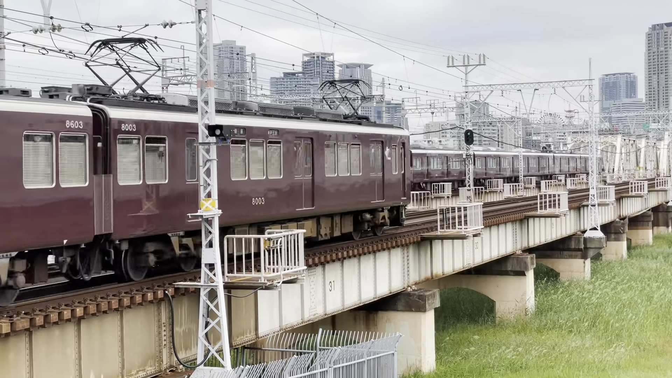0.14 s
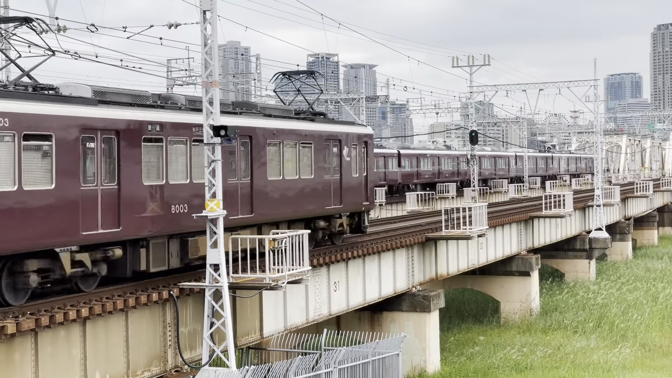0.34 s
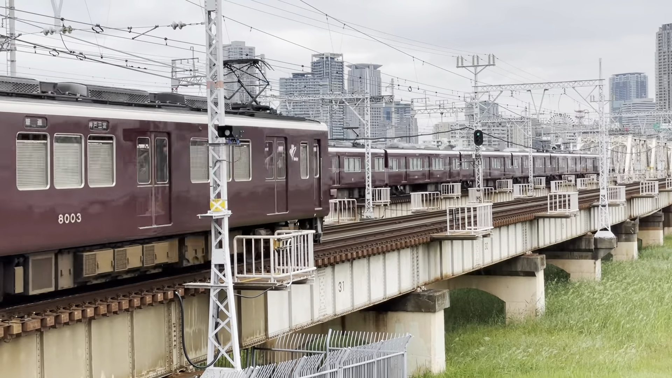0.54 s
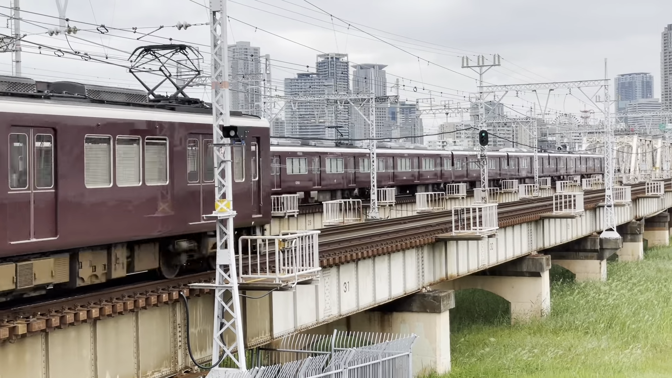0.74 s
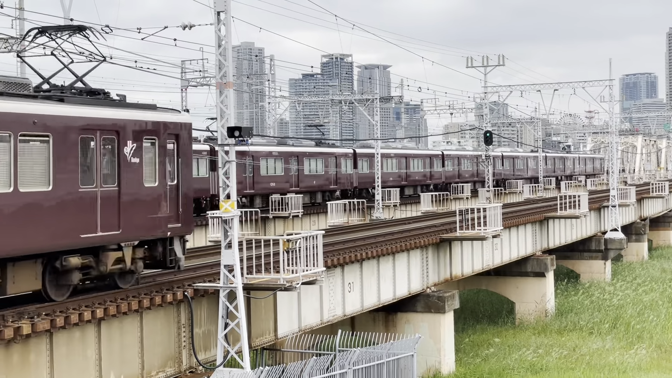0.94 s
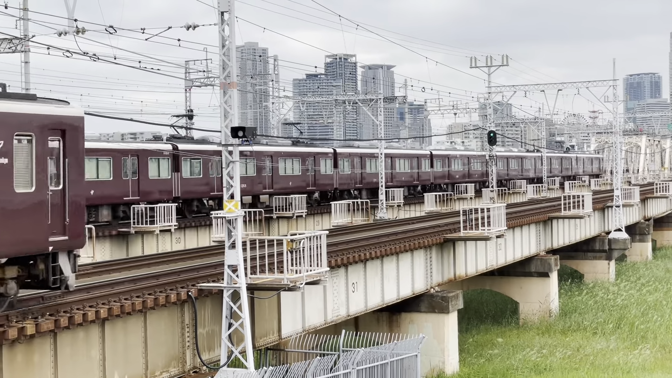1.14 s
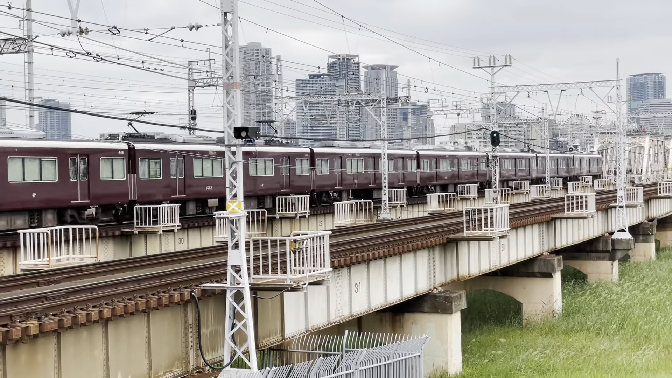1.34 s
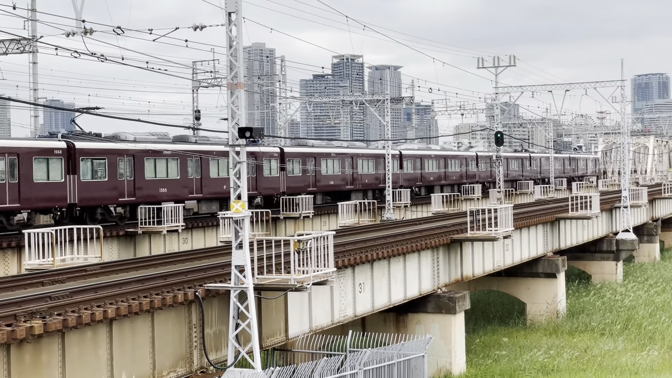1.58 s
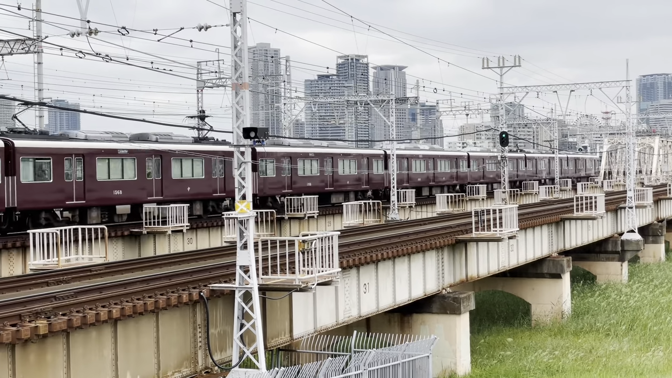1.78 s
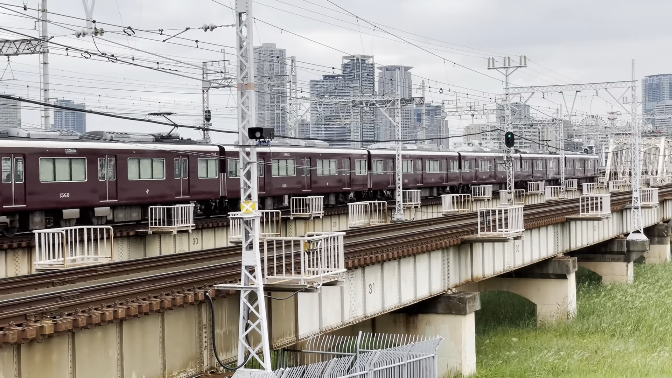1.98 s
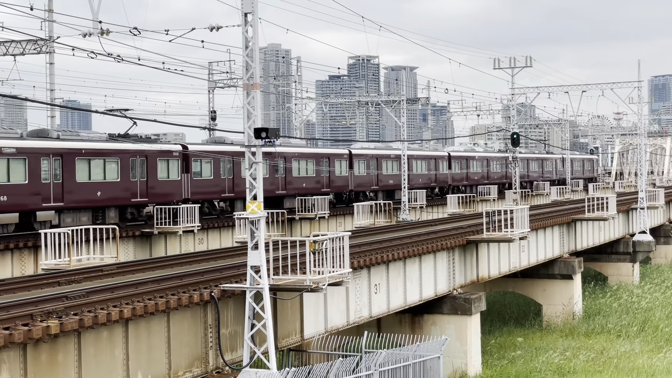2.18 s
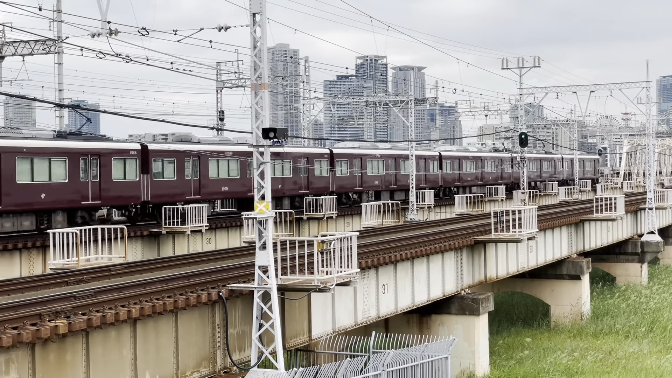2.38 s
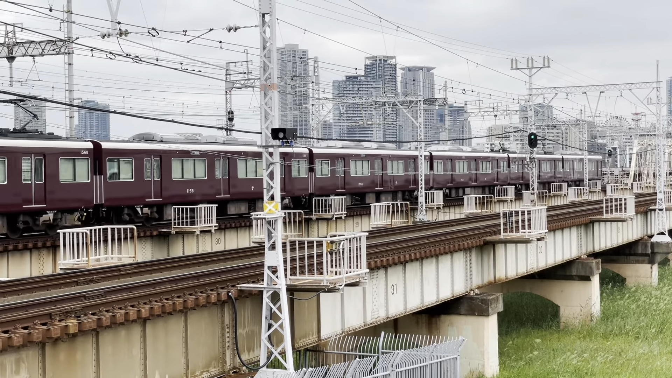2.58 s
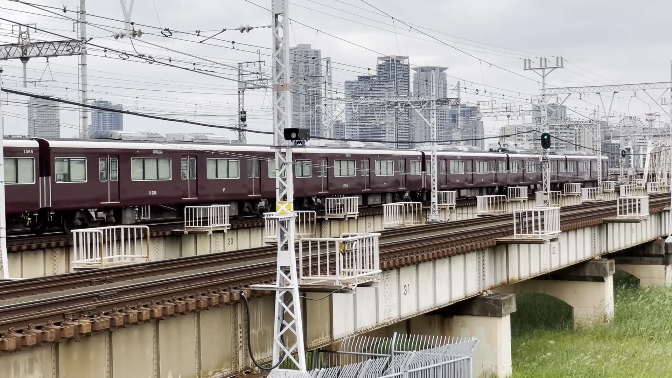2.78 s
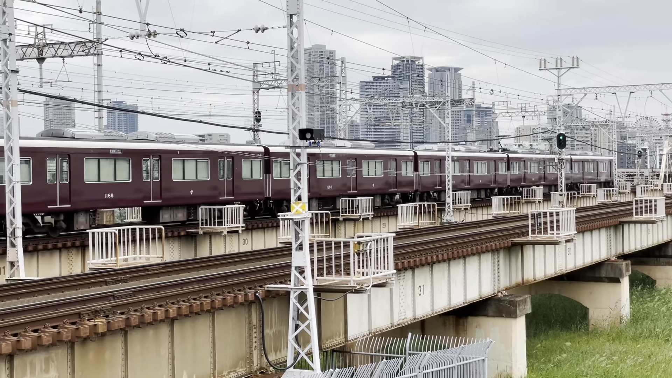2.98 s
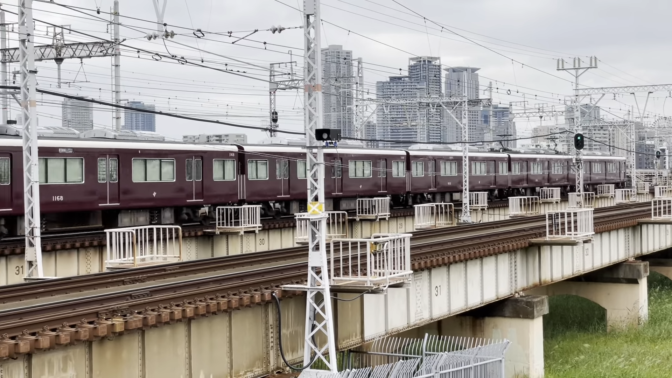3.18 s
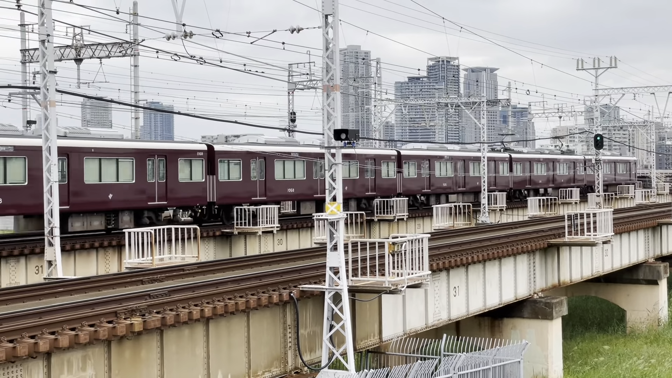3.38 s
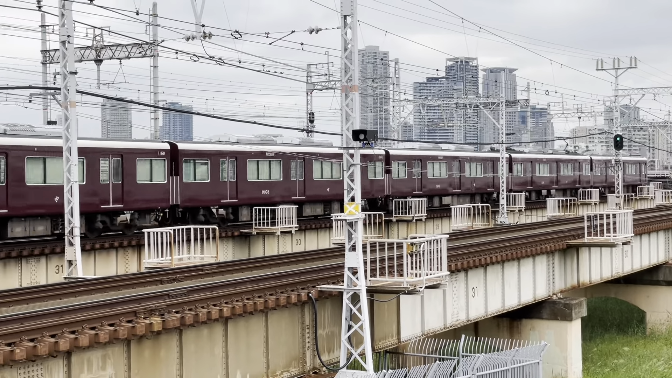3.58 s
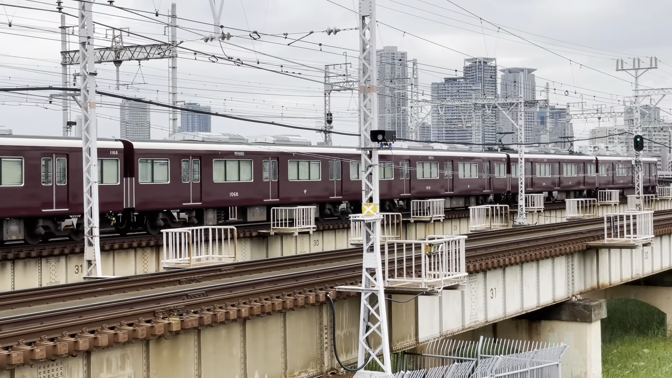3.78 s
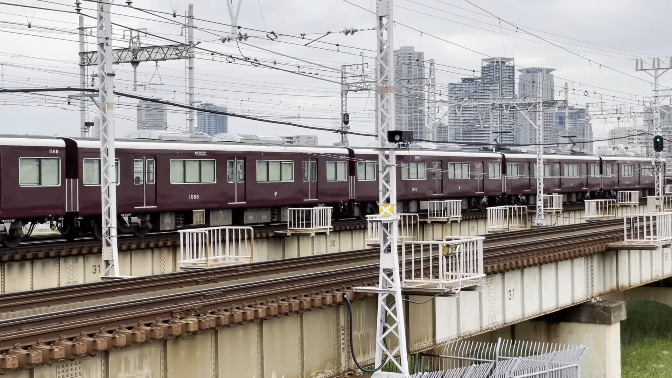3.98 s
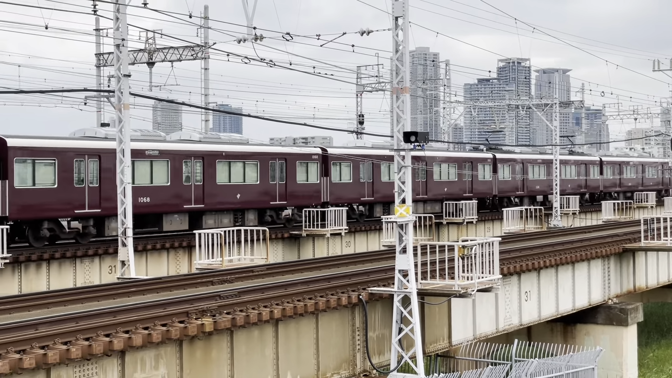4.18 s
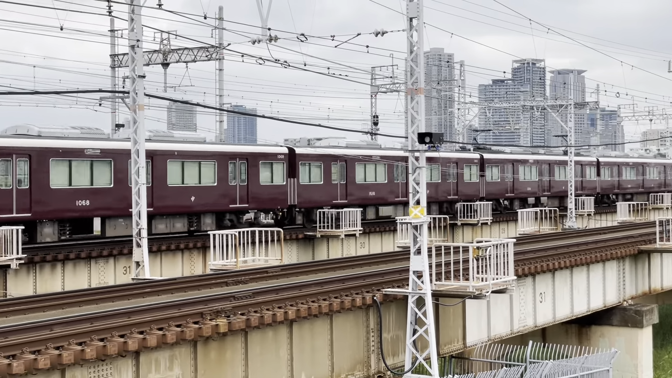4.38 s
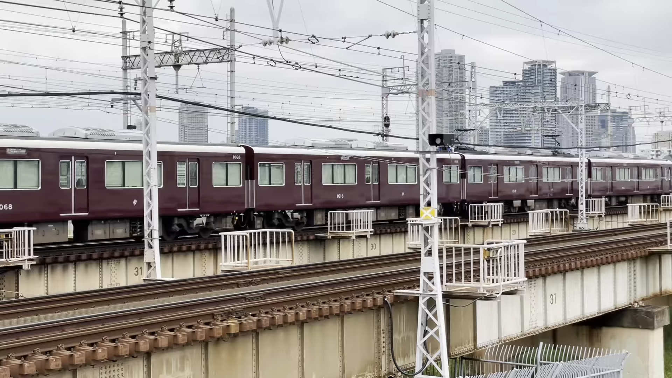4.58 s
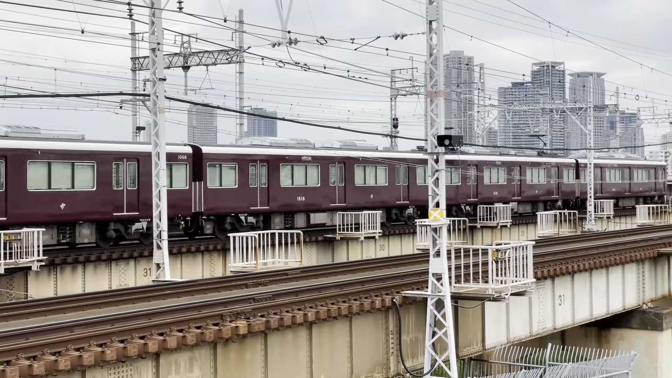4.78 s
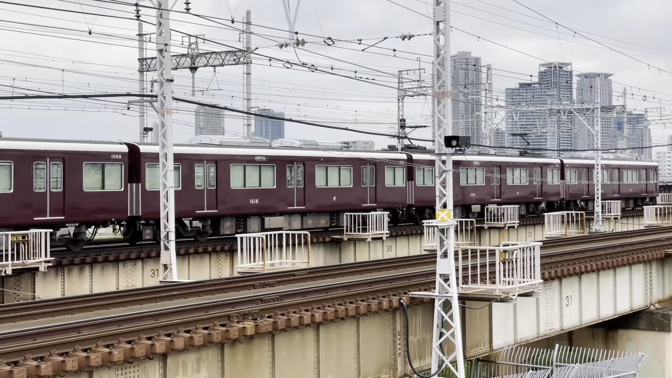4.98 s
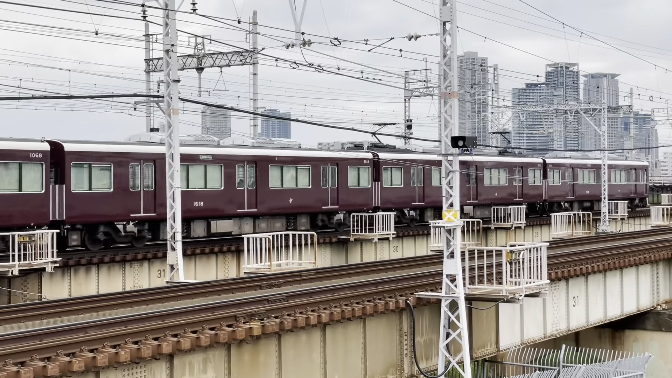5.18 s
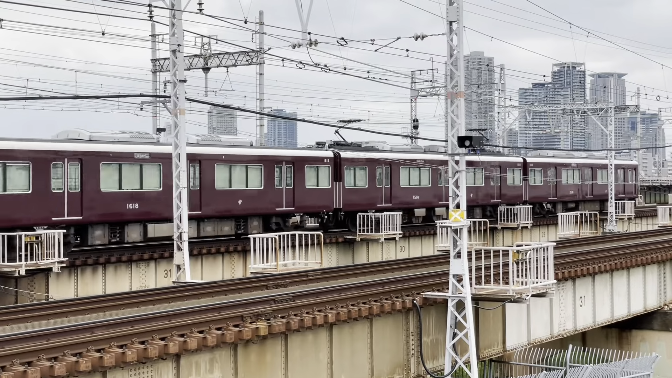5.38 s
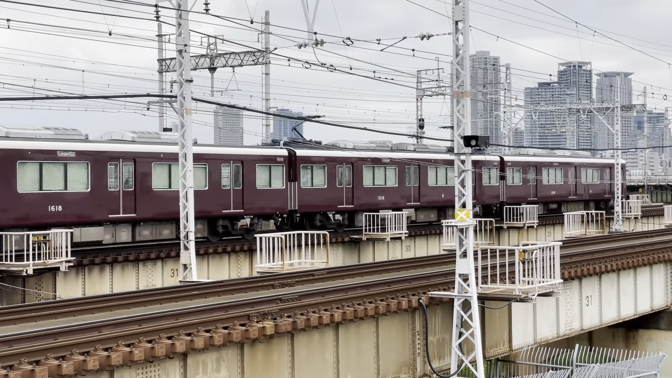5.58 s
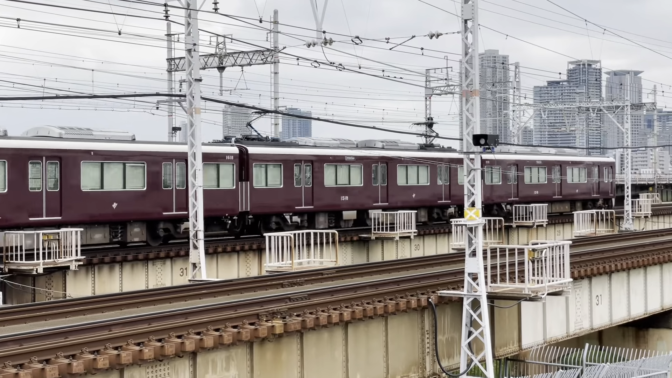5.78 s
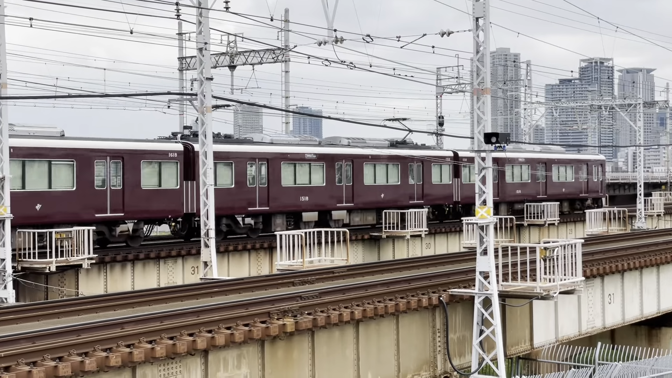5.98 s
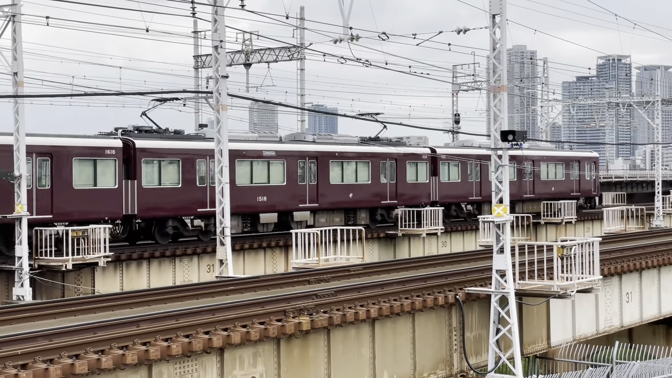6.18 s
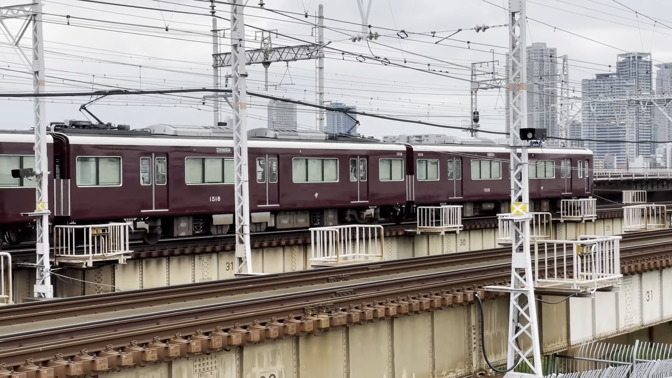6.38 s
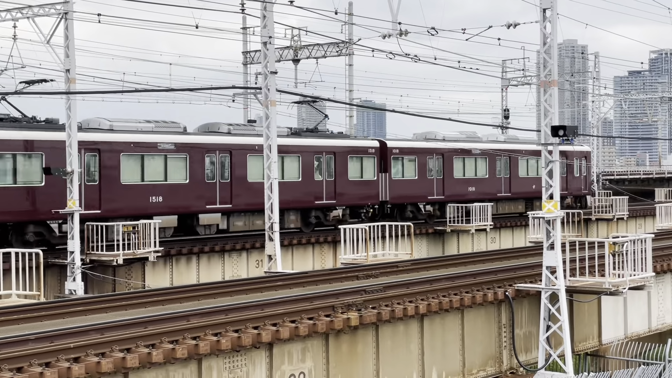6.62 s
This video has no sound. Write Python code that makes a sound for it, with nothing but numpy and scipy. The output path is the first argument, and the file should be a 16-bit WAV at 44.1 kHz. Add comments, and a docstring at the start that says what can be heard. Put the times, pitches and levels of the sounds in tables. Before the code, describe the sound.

A near train's last wheels thump and clang across a bridge joint, its whine sinking, then a farther train clatters on over booming girders.

```python
"""Rolling wheels of two electric trains on a steel girder bridge, heard from the riverbank.
Filtered noise makes deck roar and rail hiss; the near train's last axles pound a rail joint, its whine sinks.
Far axles clack over four joints, timed from speed and spacing: decaying noise bursts, with single clacks
of varied strength among them. Girders boom and web plates hum as resonant noise and decaying sines;
deck panels ring, loose steel rattles, ticks and clinks; a wheel flange squeaks."""
import sys
import numpy as np
from scipy import signal
from scipy.fft import rfft, irfft, next_fast_len
from scipy.io import wavfile
from scipy.ndimage import uniform_filter1d, map_coordinates

SR = 44100
rng = np.random.default_rng(int(sys.argv[2]) if len(sys.argv) > 2 else 0)


def materialize(psi):
    """Save the field psi as 16-bit PCM at rate SR to the path in sys.argv[1].

    A 1-D psi becomes a single channel; in a 2-D psi each row is a channel.
    """
    bounded = np.clip(np.atleast_2d(psi).T, -1, 1)
    quanta = np.round(bounded * 32767).astype(np.int16)
    wavfile.write(sys.argv[1], SR, quanta)


N = 293265

# "rel": relative level, before normalization, trims or sums
# rolling noise, swelling with each group of bogies: time_s, roar_rel_db, hiss_rel_db
ROLLING_LEVELS = [(0.0, -22, -32), (0.55, -23, -34.5), (0.85, -24.5, -35.5), (1.45, -24.5, -35.5),
                  (1.6, -24, -34.5), (1.7, -24, -32), (1.85, -23.5, -32), (2.03, -25.5, -34),
                  (2.15, -24.5, -35), (2.31, -26.5, -36), (2.46, -26, -34), (2.56, -26, -35.5),
                  (2.93, -25, -34.5), (3.1, -26, -34), (3.31, -26, -37), (3.42, -27, -37), (3.54, -27, -36),
                  (3.85, -24.5, -34), (4.1, -26, -33.5), (4.29, -26.5, -41), (4.41, -26, -37),
                  (4.85, -25, -33), (5.2, -26.5, -36), (5.3, -27, -37), (5.55, -26, -36.5),
                  (5.8, -25, -33.5), (6.15, -25.5, -36), (6.35, -27, -37.5), (6.5, -26, -37),
                  (6.65, -26, -38)]
# near train leaves: time_s, near_power_share (0-1)
NEAR_POWER_SHARE = [(0, 0.93), (1.25, 0.4), (1.7, 0.26), (2.6, 0.27)]
# far rail resonance, sinking as the far wheels draw near: time_s, pitch_hz
RAIL_SONG_PITCH = [(1.6, 2210), (2.2, 2160), (3.0, 2040), (6.65, 1957)]
# drive whine of the near train: time_s, pitch_hz, level_db
WHINE_TRACK = [(0, 5760, -59), (.33, 5760, -51), (.65, 5680, -49), (.87, 5600, -50), (1.2, 5470, -51),
               (1.6, 5450, -54.5), (2.0, 5410, -59), (2.7, 5380, -80)]
# far span under bogies and between them: time_s, boom_db, hum_db (before the track blend)
FAR_SPAN_LEVELS = [(1.58, -28.5, -45), (1.8, -30, -28), (2.17, -27, -28.5), (2.32, -26.5, -29.5),
                   (2.47, -30.5, -37), (2.68, -30, -28), (2.93, -26, -27), (3.1, -28, -26),
                   (3.28, -29, -31.5), (3.55, -31, -29.5), (3.76, -26, -26.5), (4.1, -26.5, -26),
                   (4.43, -33, -34.5), (4.62, -29, -27.5), (4.9, -29, -31), (5.1, -23, -28),
                   (5.35, -26, -29.5), (5.52, -29, -36), (5.72, -26, -26.5), (6.16, -25.5, -23.5),
                   (6.38, -33, -27.5), (6.65, -26, -32.5)]
NEAR_BOOM_DB = -24.5  # near girders under plain rolling, before the track blend

# girder modes: centre_hz, nominal_width_hz (girder_noise widens it), level_rel_db
NEAR_GIRDER_MODES = [(61, 23, -5), (87, 13, -12), (107, 12, -13.5)]
FAR_GIRDER_MODES = [(52.5, 9.2, 3.5), (64.4, 10, -3.5), (78, 18, -4.5), (99, 42, -2)]
# web plate modes: centre_hz, nominal_width_hz (girder_noise widens it), level_rel_db
NEAR_WEB_MODES = [(138.7, 15, 1.5), (164, 24, -1.5), (197, 13, -0.5), (236.4, 27, 8)]
FAR_WEB_MODES = [(147.7, 11.6, 4), (176.4, 9.5, -2), (196, 20, -3.5), (216, 23, -3)]
# deck plate humps on the broad spectrum: centre_hz, width_hz, hump_db
NEAR_PLATE_HUMPS = [(316, 46, 1.5), (372, 31, -2), (655, 65, 0.5), (1630, 160, 3)]
FAR_PLATE_HUMPS = [(259, 74, 1.26), (332, 50, 2), (690, 110, 0.8)]
# rail and wheel humps on the broad spectrum: centre_hz, width_hz, hump_db
NEAR_RAIL_HUMPS = [(1130, 200, 2), (1630, 190, 4.2), (2120, 360, 2)]
RAIL_HUMPS = [(2780, 410, 3), (3570, 200, 2.3), (4050, 350, 3.5)]
WHEEL_HUMPS = [(1690, 90, 2), (2570, 92, 1.5), (7000, 400, 7.3), (7600, 230, 11)]

# broad spectra of deck, rail, wheel and loose fastenings: frequency_hz, density_rel_db_per_hz
NEAR_DECK_SPECTRUM = [(50, -32), (110, -3.5), (200, -3.5), (290, -1), (390, -5), (800, -8.5), (1200, -15.5),
                      (1800, -23), (3000, -52), (6000, -74)]
FAR_DECK_SPECTRUM = [(60, -48), (115, -16.5), (160, -1.5), (300, -2.5), (460, -6), (580, -7.5), (800, -7.5),
                     (1200, -16), (1700, -29), (3000, -44), (6000, -62)]
RAIL_SPECTRUM = [(600, -49), (1300, -3.5), (2100, -0.5), (2450, -2), (2850, -2), (4000, -8), (5300, -10),
                 (6000, -15), (7200, -13.5), (9500, -21), (13500, -24.5), (15000, -40)]
WHEEL_SPECTRUM = [(500, -25), (1100, 4), (2100, 0.5), (2500, -2.5), (3800, -6.5), (5300, -13), (7200, -19),
                  (10000, -41), (15000, -53)]
NEAR_WHEEL_SPECTRUM = [(500, -16), (1100, 0.5), (1900, 3.5), (2500, -2.5), (3800, -5.5), (5300, -8.5),
                       (7200, -17.5), (10000, -33), (15000, -55)]
RATTLE_SPECTRUM = [(3000, -27), (6500, 7.5), (8000, 13.5), (10000, 8.5), (12000, 5), (13700, 4),
                   (15000, -11)]
# near blow in the deck, near blow in the rail, rim on rail end: frequency_hz, density_rel_db_per_hz
THUD_SPECTRUM = [(50, -38), (110, -14), (170, -4.5), (290, -0.5), (400, -2), (520, -5), (750, -31),
                 (1500, -52)]
SLAM_SPECTRUM = [(250, -35), (480, -4), (750, 1), (1200, -8), (1800, -15), (3000, -52), (6000, -70)]
CLINK_SPECTRUM = [(1200, -18), (2000, -1), (3000, 1), (4300, -9), (5500, -8), (8000, -26), (15000, -50)]

# girder heaving under a passing axle: start_s, pitch_hz, level_db
GIRDER_HEAVES = [(.06, 69, -26), (.13, 74, -28), (.22, 94, -21), (.285, 85, -22.5), (.41, 80, -22),
                 (.53, 92, -21), (.62, 83.5, -19.5), (.78, 83, -24), (.87, 84, -29), (.925, 81, -26),
                 (1.085, 88.4, -21.5), (1.17, 90, -21.5), (1.23, 88.5, -14.5), (1.35, 92, -24.5),
                 (1.75, 79.6, -23), (1.83, 77.6, -23.5), (1.92, 73.3, -25), (2.09, 76.6, -23.5),
                 (2.2, 76, -23), (2.74, 72.6, -24), (2.9, 59, -21), (2.98, 69.4, -27), (3.31, 66, -27),
                 (3.46, 75.4, -25.5), (3.71, 75, -23), (3.795, 60, -22), (3.91, 56.6, -24.5),
                 (4.05, 65.5, -21.5), (4.28, 65, -27), (4.47, 70, -24), (4.715, 66, -23), (4.81, 71, -25),
                 (5.04, 55.6, -25), (5.145, 59, -24), (5.495, 71, -22), (5.94, 66.2, -28),
                 (6.065, 82, -22.5), (6.225, 64, -21), (6.305, 71.5, -23), (6.39, 68, -27),
                 (6.45, 71.6, -24.5), (6.57, 71, -26)]
# web plate humming under a passing bogie: start_s, pitch_hz, level_db
WEB_HUMS = [(.265, 204, -27), (.645, 222.3, -21), (1.74, 168, -26), (1.81, 157, -27), (2.07, 150.5, -24),
            (2.565, 193.7, -25), (2.705, 178, -24.5), (2.88, 263.6, -24.5), (2.93, 160, -26),
            (3.06, 151.6, -22), (3.145, 200, -26.5), (3.555, 205, -23.5), (3.685, 177.5, -24),
            (3.925, 190, -25), (4.545, 211.5, -21), (4.665, 175, -25), (4.78, 289, -27.5),
            (4.885, 207.5, -27), (5.04, 285, -28.5), (4.975, 162, -24.5), (5.06, 198.5, -24),
            (5.71, 151.2, -22.5), (5.98, 147, -27), (6.085, 189.5, -22.5), (6.17, 215, -25.5)]
# steel on steel: start_s, centre_hz, level_db
STEEL_TICKS = [(.116, 12500, -51), (.252, 13000, -41), (.428, 12000, -48), (1.203, 13100, -39),
               (3.237, 12000, -47), (4.334, 8550, -41), (4.834, 13330, -42), (6.046, 8850, -44),
               (6.284, 8950, -36.5)]
# last near axles at the joint, two to a bogie:
# start_s, thud_db, slam_rel_db, clang_db, rattle_db, web_ring_db, boom_db (last two before the track blend)
NEAR_AXLE_BLOWS = [(0.122, -20, -23, -31.5, -48, -38, -31), (0.224, -20.5, -19, -28, -44, -26, -27),
                   (0.43, -17.5, -21, -29, -44, -23, -31), (0.536, -17.5, -21, -29, -44, -17.5, -24),
                   (1.076, -17.5, -21, -30, -46, -18, -24), (1.182, -18, -19, -29.5, -46, -19.5, -23)]
THUD_DELAY_S = 0.0057  # deck answers after the rail
PLATE_HZ, PLATE_DB = 326.3, -5  # plate under the near joint; level relative to thud
# cross beam punch; level relative to thud
PUNCH_HZ, PUNCH_DB, PUNCH_DELAY_S = 191.5, -0.5, 0.02113
# flange squeaks: peak_s, length_s, level_db
FLANGE_SQUEAKS = [(0.267, 0.045, -42), (0.552, .1, -49)]
SQUEAK_HZ = 13650
# deck panels under the wheels: start_s, centre_hz, level_db
PANEL_RING_EVENTS = [(1.22, 530, -25), (1.79, 720, -32), (2.07, 440, -28), (2.185, 427, -23),
                     (2.739, 498, -36), (2.87, 390, -27), (3.70, 750, -32), (3.72, 380, -32),
                     (4.02, 800, -35), (4.70, 770, -29), (4.77, 390, -29.5), (5.01, 736, -31),
                     (5.735, 740, -26.5), (5.92, 600, -39), (6.09, 830, -32)]
PANEL_WIDTH_HZ = 170
# far coupling, a bogie on either side, at the first joint:
# start_s, knock_rel_db, clang_rel_db, rattle_rel_db
COUPLING_BLOWS = [(1.616, -6, -7.5, -18), (2.593, -3, -2.5, -13), (3.567, -2, -1.5, -7), (4.567, -2, 0, -5),
                  (5.59, -4, 0.5, -3)]
# each far joint: knock_rel_db, clang_rel_db, rattle_rel_db
JOINT_LEVELS = [(-24, -31, -48), (-24.5, -35, -44), (-29, -33.5, -45), (-29.5, -43, -53)]
# far train slowing a little: time_s, speed_m_per_s
FAR_TRAIN_SPEED = [(1.6, 19.5), (3.6, 19.1), (4.6, 18.75), (5.6, 18.15)]
# four axles around a coupling: distance_behind_first_m
AXLE_OFFSETS_M = [0, 2.15, 6.1, 8.25]
# the same axles: strength_rel_db
AXLE_STRENGTHS_DB = [1.5, -0.54, -0.79, 1.5]
# four far joints: distance_past_first_m
JOINT_OFFSETS_M = [0, 2.8, 6.25, 8.35]
# single far wheel clacks, strong and faint: start_s, knock_db, clang_db, rattle_db
FAR_CLACKS = [(1.618, -36, -31, -56), (1.725, -42, -34, -57), (1.945, -22, -33, -49),
              (2.075, -24.5, -29.5, -42), (2.188, -22, -32.5, -45), (2.350, -25, -35.5, -49),
              (2.598, -31, -34, -59), (2.728, -20, -28.5, -42.5), (2.838, -23, -42, -44),
              (3.050, -24, -31, -42), (3.164, -40, -40, -43), (3.340, -37, -48, -47),
              (3.688, -35, -29, -43), (3.795, -28, -35, -47), (3.895, -34.5, -37, -54),
              (4.000, -38, -38, -46), (4.035, -37, -33, -50), (4.214, -33, -36.5, -47),
              (4.328, -25, -39, -46), (4.465, -29, -46, -48), (4.705, -24, -33, -44),
              (4.895, -43, -41, -49), (5.045, -35, -31.5, -48), (5.240, -27, -46, -51),
              (5.338, -40, -43, -52), (5.715, -30, -34, -50), (5.750, -36, -31.5, -55),
              (5.932, -24, -37, -46), (6.085, -30, -30, -42), (6.399, -34, -49, -52)]
# wheel rim on a rail end: start_s, level_db
RIM_CLINKS = [(1.955, -41), (2.368, -34), (2.845, -44), (3.045, -40), (3.165, -37), (3.338, -43),
              (3.69, -45), (4.22, -40), (4.335, -40), (4.895, -39), (5.05, -39), (5.342, -37), (6.08, -37),
              (6.205, -41), (6.4, -37)]

# microphone ports: frequency_hz, likeness (0-1)
PORT_LIKENESS = [(60, .997), (200, .96), (350, .88), (450, .68), (900, .73), (1120, .63), (1450, .92),
                 (2000, .99), (5000, .92), (7000, .86), (8900, .97), (12000, .76), (13200, .98)]
# microphone ports: frequency_hz, left_lead_rad
PORT_LEAD = [(60, .05), (350, .48), (450, .95), (1050, 1.1), (1350, .3), (2000, 0), (3000, .6), (5300, .6),
             (5700, -1.6), (6700, -.8), (7600, -2.3), (8900, -3.14), (13000, -6.28)]
# microphone ports: frequency_hz, left_minus_right_db
PORT_LEVEL_DIFFERENCE = [(60, .2), (220, .6), (420, 1.5), (650, 1.4), (950, 4), (1400, 1.3), (1700, 1.2),
                         (2100, 0)]
TOP_HZ = 15000


def amp(db):
    """Decibels to gain."""
    return 10 ** (np.asarray(db) / 20)


def unit(x):
    """Scale to rms 1."""
    return x / np.sqrt(np.mean(x ** 2) + 1e-20)


def along(points, hz):
    """Values at hz, interpolated on a log frequency axis."""
    point_hz, values = np.transpose(points)
    return np.interp(np.log(hz + 1), np.log(point_hz + 1), values)


def curves(rows):
    """One value per sample for each column after the time."""
    time_s, *columns = np.transpose(rows)
    return [np.interp(np.arange(N) / SR, time_s, column) for column in columns]


def wobble(knots_per_s):
    """Smooth random curve through Gaussian knots."""
    knots = rng.standard_normal(int(N * knots_per_s / SR) + 4)
    return map_coordinates(knots, [np.arange(N) * knots_per_s / SR])


def filtered(x, response):
    """Apply a complex frequency response by FFT, padded by at least half a second."""
    size = next_fast_len(N + SR // 2)
    hz = np.fft.rfftfreq(size, 1 / SR)
    return irfft(rfft(x, size) * response(hz), size)[..., :N]


def noise(response):
    """Two independent noises (direct and scattered sound) of one colour, joint rms 1."""
    return unit(filtered(rng.standard_normal((2, N)), response))


def resonance(hz, centre_hz, width_hz):
    """Gain of one steep-sided resonance; width is at half gain."""
    detuning = (hz * hz - centre_hz ** 2) / (hz * width_hz + 1)
    return 1 / (1 + detuning ** 2)


def steel(spectrum, humps=(), grain_db=0, grain_rate=200):
    """Noise of a steel part: broad spectrum plus resonant humps, broken up by chattering contact."""
    def response(hz):
        hump_db = sum(db / (1 + (2 * (hz - centre) / width) ** 2) for centre, width, db in humps)
        return amp(along(spectrum, hz) + hump_db)

    chatter = rng.standard_normal((2, N)) * amp(grain_db * wobble(grain_rate))
    return unit(filtered(chatter, response))


def evened(x, steadiness, size):
    """Even out vibration strength over size samples; steadiness 1 is fullest."""
    power = np.abs(uniform_filter1d(x ** 2, size=size, axis=1))
    strength = np.sqrt(power + 1e-6)
    return unit(x / strength ** np.clip(steadiness, 0, 1))


def patches(x, depth_db):
    """Neighbouring steel modes swell and fade by turns: smooth random gains over time and frequency."""
    z = signal.stft(x, nperseg=2048)[2]
    field = rng.standard_normal(z.shape[1:])
    field = uniform_filter1d(field, size=3, axis=0)  # frequency
    field = uniform_filter1d(field, size=5, axis=1)  # time
    gain = amp(abs(depth_db) * unit(field))
    return unit(signal.istft(z * gain, nperseg=2048)[1][:, :N])


def gliding(hz, half_width_hz, steadiness):
    """Fuzzy line of rms 1 on a pitch curve: low-pass complex noise shifted up."""
    line = lambda f: 1 / (1 + (f / half_width_hz) ** 2)
    fuzz = noise(line) + 1j * noise(line)
    carrier = np.exp(2j * np.pi * np.cumsum(hz) / SR)
    return evened(np.real(fuzz * carrier), steadiness, size=200)


def strike(t, rise_s, t60_s):
    """A blow spreads through the steel, then decays exponentially; peak 1."""
    shape = (1 - np.exp(-(t / rise_s) ** 2)) * amp(-60 * t / t60_s)
    return shape / shape.max()


def blows(times_s, levels_db, rise_s, t60_s):
    """Envelope of a row of blows; their powers add."""
    power = np.zeros(N + SR)
    shape = strike(np.arange(SR) / SR, rise_s, t60_s)
    for start_s, db in zip(times_s, levels_db):
        first = max(round(start_s * SR), 0)
        power[first:][:SR] += (amp(db) * shape) ** 2
    return np.sqrt(power[:N])


def rings(rows, width_hz, rise_s, t60_s, size):
    """One resonant noise burst, at most 0.5 s, per row, evened over size samples."""
    out = np.zeros((2, N + SR))
    t = np.arange(SR // 2) / SR
    hz = np.fft.rfftfreq(len(t), 1 / SR)
    shape = strike(t, rise_s, t60_s)
    for start_s, centre_hz, db in rows:
        spectrum = rfft(rng.standard_normal((2, len(t))))
        ring = irfft(spectrum * resonance(hz, centre_hz, width_hz), len(t))
        steady = evened(ring, steadiness=0.52, size=size)
        out[:, round(start_s * SR):][:, :len(t)] += amp(db) * shape * steady
    return out[:, :N]


def swings(rows, rise_s, t60_s):
    """One bending mode per row swings up and dies: a sine with random phases."""
    out = np.zeros((2, N + SR))
    t = np.arange(SR) / SR
    shape = np.sqrt(2) * strike(t, rise_s, t60_s)
    phases = rng.random((len(rows), 2, 1))  # cycles
    for (start_s, hz, db), phase in zip(rows, phases):
        first = max(round(start_s * SR), 0)
        out[:, first:][:, :SR] += amp(db) * shape * np.sin(2 * np.pi * (hz * t + phase))
    return out[:, :N]


def both_tracks(near, far):
    """Power blend of the two tracks as the near train leaves."""
    share = np.clip(curves(NEAR_POWER_SHARE)[0], 0, 1)
    return np.sqrt(share) * near + np.sqrt(1 - share) * far


def girder_noise(modes, steadiness):
    """Low bending modes kept ringing by the wheels at a fairly even strength."""
    def response(hz):
        power = sum((amp(db) * resonance(hz, centre, 1.53 * width)) ** 2 / width
                    for centre, width, db in modes)
        return np.sqrt(power)

    return evened(noise(response), steadiness, size=2200)


def rolling():
    """Rough wheels shake deck and rails without pause: deck roar, rail hiss and a sinking rail resonance."""
    roar_db, hiss_db = curves(ROLLING_LEVELS)
    near_deck = amp(3.0) * steel(NEAR_DECK_SPECTRUM, NEAR_PLATE_HUMPS)
    far_deck = amp(1.27) * steel(FAR_DECK_SPECTRUM, FAR_PLATE_HUMPS, grain_db=1.53, grain_rate=90)
    roar = amp(roar_db) * both_tracks(near_deck, far_deck)
    song = amp(-10.5) * gliding(curves(RAIL_SONG_PITCH)[0], half_width_hz=64, steadiness=.2)
    near_rail = steel(RAIL_SPECTRUM, NEAR_RAIL_HUMPS)
    far_rail = steel(RAIL_SPECTRUM, RAIL_HUMPS, grain_db=1.15, grain_rate=160) + song
    rails = patches(both_tracks(near_rail, far_rail), depth_db=2)
    hiss = amp(hiss_db - 2.0 + 0.68 * wobble(25)) * rails
    return roar + hiss


def girders():
    """Girders boom under the rolling cars and heave slowly after each near axle."""
    start_s, *_, boom_db = np.transpose(NEAR_AXLE_BLOWS)
    near_gain = np.hypot(amp(NEAR_BOOM_DB), blows(start_s, boom_db, rise_s=0.14, t60_s=0.97))
    far_gain = amp(curves(FAR_SPAN_LEVELS)[0])
    near = near_gain * girder_noise(NEAR_GIRDER_MODES, steadiness=0.91)
    far = far_gain * girder_noise(FAR_GIRDER_MODES, steadiness=0.97)
    return both_tracks(near, far)


def webs():
    """Tall steel plates ring on after each near axle and hum under the far bogies."""
    roar_db = curves(ROLLING_LEVELS)[0]
    hum_db = curves(FAR_SPAN_LEVELS)[1]
    start_s, *_, ring_db, _ = np.transpose(NEAR_AXLE_BLOWS)
    near_gain = np.hypot(amp(roar_db - 3.5), blows(start_s, ring_db, rise_s=0.021, t60_s=1.0))
    far = amp(hum_db) * girder_noise(FAR_WEB_MODES, steadiness=0.93)
    near = near_gain * girder_noise(NEAR_WEB_MODES, steadiness=1.0)
    return both_tracks(near, far)


def whine():
    """Near train's drive: a fuzzy line on a pitch curve that sinks as by Doppler shift."""
    hz, db = curves(WHINE_TRACK)
    return amp(db) * gliding(hz, half_width_hz=100, steadiness=.65)


def clatter(count):
    """Faint random clacks from sleepers and joints further along, louder when the rails are loud."""
    when, strength = rng.random((count, 2)).T
    taps = unit(blows(when * N / SR, 7 * strength, rise_s=0.0074, t60_s=0.052))
    gain = amp(curves(ROLLING_LEVELS)[1] - 12.5)
    return gain * taps * steel(WHEEL_SPECTRUM, RAIL_HUMPS, grain_db=3.5, grain_rate=370)


def surges():
    """Span rumbles in uneven lumps: girders heave and web plates hum as decaying sines under the load."""
    heaves = swings(GIRDER_HEAVES, rise_s=0.034, t60_s=.22)
    hums = swings(WEB_HUMS, rise_s=0.027, t60_s=0.31)
    return heaves + hums


def ticks():
    """Short bright ticks of loose steel parts: wide resonant noise bursts."""
    return rings(STEEL_TICKS, width_hz=3000, rise_s=.001, t60_s=0.073, size=200)


def near_joint():
    """Near axles drop into the rail gap: wheel clangs, fastenings rattle, rail slams, deck thuds and rings."""
    start_s, thud_db, slam_db, clang_db, rattle_db, _, _ = np.transpose(NEAR_AXLE_BLOWS)
    rise_s = .025
    deck = evened(steel(THUD_SPECTRUM, NEAR_PLATE_HUMPS), steadiness=1.0, size=900)
    thud = blows(start_s + THUD_DELAY_S, thud_db, rise_s, t60_s=0.47) * deck

    impact = blows(start_s + PUNCH_DELAY_S, slam_db - 1.5, rise_s=.006, t60_s=.13)
    slam_envelope = np.hypot(blows(start_s, slam_db - 1.0, rise_s, t60_s=0.29), impact)
    slam = slam_envelope * steel(SLAM_SPECTRUM, NEAR_PLATE_HUMPS, grain_db=0.5, grain_rate=240)

    wheel = patches(steel(NEAR_WHEEL_SPECTRUM, WHEEL_HUMPS), depth_db=2.5)
    clang = blows(start_s, clang_db, rise_s, t60_s=0.31) * wheel
    fastenings = steel(RATTLE_SPECTRUM, grain_db=3.0, grain_rate=340)
    rattle = blows(start_s, rattle_db, rise_s, t60_s=0.44) * fastenings

    plate_rows = [(s, PLATE_HZ, db + PLATE_DB) for s, db in zip(start_s, thud_db)]
    plate = swings(plate_rows, rise_s=0.029, t60_s=.45)
    punch_rows = [(s + PUNCH_DELAY_S, PUNCH_HZ, db + PUNCH_DB) for s, db in zip(start_s, thud_db)]
    punch = swings(punch_rows, rise_s=0.011, t60_s=0.12)
    return thud + punch + plate + slam + clang + rattle


def squeak():
    """A flange rubs the rail and rings one high wheel mode: narrow noise in Gaussian swells."""
    t = np.arange(N) / SR
    rub = sum(amp(db) * np.exp(-(2 * (t - peak_s) / length_s) ** 2)
              for peak_s, length_s, db in FLANGE_SQUEAKS)
    return rub * noise(lambda hz: resonance(hz, SQUEAK_HZ, width_hz=170))


def panels():
    """Deck panels ring out as wheels cross them, each at its own pitch: resonant noise bursts."""
    return rings(PANEL_RING_EVENTS, PANEL_WIDTH_HZ, rise_s=0.017, t60_s=0.77, size=1200)


def far_blows():
    """Every listed far axle meets every joint: rows of times, knock, clang and rattle levels."""
    rows = []
    for start_s, *coupling_db in COUPLING_BLOWS:
        speed_m_per_s = np.interp(start_s, *np.transpose(FAR_TRAIN_SPEED))
        for axle_m, axle_db in zip(AXLE_OFFSETS_M, AXLE_STRENGTHS_DB):
            for joint_m, joint_db in zip(JOINT_OFFSETS_M, JOINT_LEVELS):
                hit_s = start_s + (axle_m + joint_m) / speed_m_per_s
                rows.append((hit_s, *(np.add(coupling_db, joint_db) + axle_db)))
    return np.transpose(rows)


def far_joints():
    """Far axles clack in overlapping pairs, blurred by the bridge, with single clacks of varied strength."""
    start_s, knock_db, clang_db, rattle_db = np.hstack([far_blows(), np.transpose(FAR_CLACKS)])
    deck = evened(steel(FAR_DECK_SPECTRUM, FAR_PLATE_HUMPS), steadiness=0.34, size=1200)
    knock = blows(start_s, knock_db, rise_s=0.013, t60_s=0.27) * deck
    wheel = patches(steel(WHEEL_SPECTRUM, grain_db=0.5, grain_rate=230), depth_db=1.0)
    clang = blows(start_s, clang_db, rise_s=0.0078, t60_s=0.41) * wheel
    fastenings = steel(RATTLE_SPECTRUM, grain_db=2.5, grain_rate=360)
    rattle = blows(start_s, rattle_db, rise_s=0.0064, t60_s=0.37) * fastenings
    return knock + clang + rattle


def clinks():
    """Some far wheel rims chatter briefly on a rail end: bright, gritty noise bursts."""
    start_s, db = np.transpose(RIM_CLINKS)
    grit = steel(CLINK_SPECTRUM, grain_db=5, grain_rate=300)
    return blows(start_s, db, rise_s=0.0042, t60_s=0.19) * grit


def ports(pair):
    """Direct sound reaches both ports alike, scattered sound oppositely; ports differ in phase and level."""
    def mix(hz):
        angle = np.arccos(np.clip(along(PORT_LIKENESS, hz), 0, 1)) / 2
        return np.array([np.cos(angle), np.sin(angle)])

    half = np.array([[.5], [-.5]])  # left, right

    def offset(hz):
        gain = amp(half * along(PORT_LEVEL_DIFFERENCE, hz))
        return gain * np.exp(1j * half * along(PORT_LEAD, hz))

    direct, scattered = filtered(pair, mix)
    return filtered(np.array([direct + scattered, direct - scattered]), offset)


def scene():
    """Both trains on the bridge, at the two microphone ports."""
    rumble = rolling() + girders() + webs() + surges()
    near = whine() + near_joint() + squeak()
    far = far_joints() + clinks()
    loose_steel = clatter(count=200) + ticks() + panels()
    return ports(rumble + near + far + loose_steel)


def record(dry):
    """Shed the deepest bass and keep nothing from the band limit up."""
    low_cut_hz = 36
    return filtered(dry, lambda hz: (hz < TOP_HZ) / np.sqrt(1 + (low_cut_hz / (hz + 1)) ** 8))


dry = scene()
out = record(dry)
materialize(out)
```